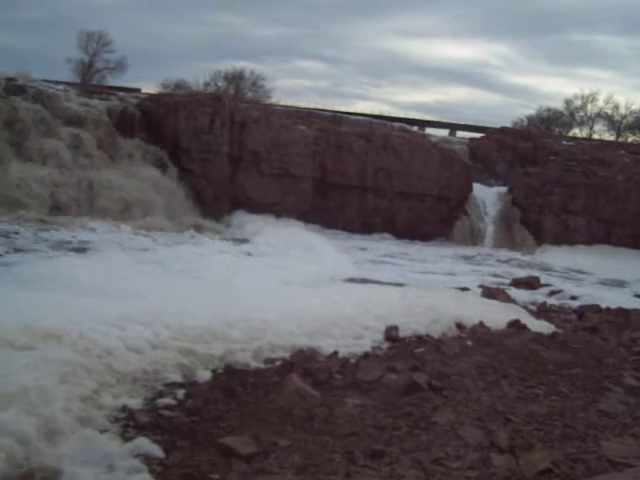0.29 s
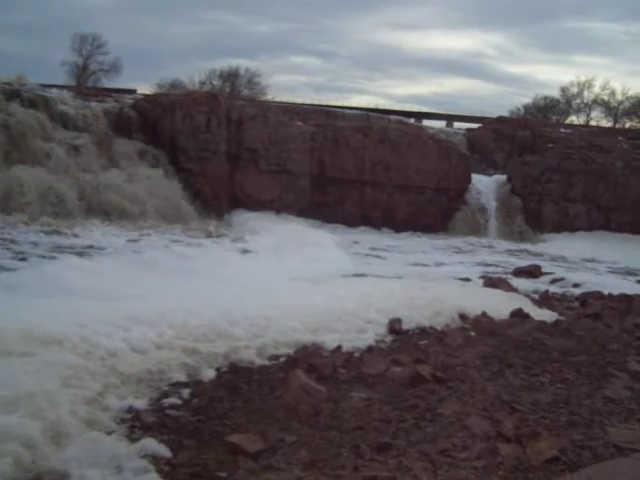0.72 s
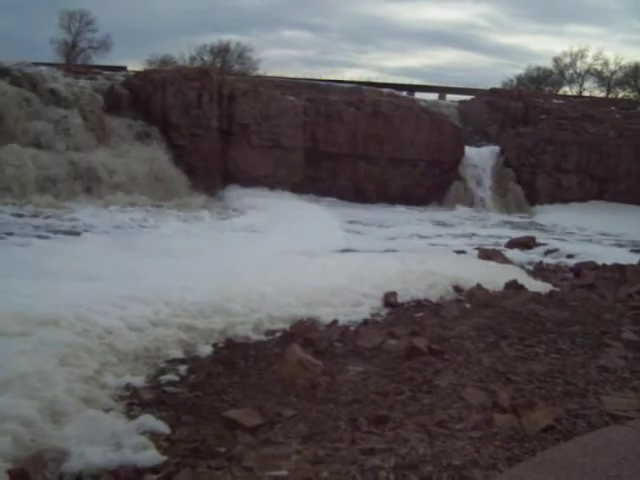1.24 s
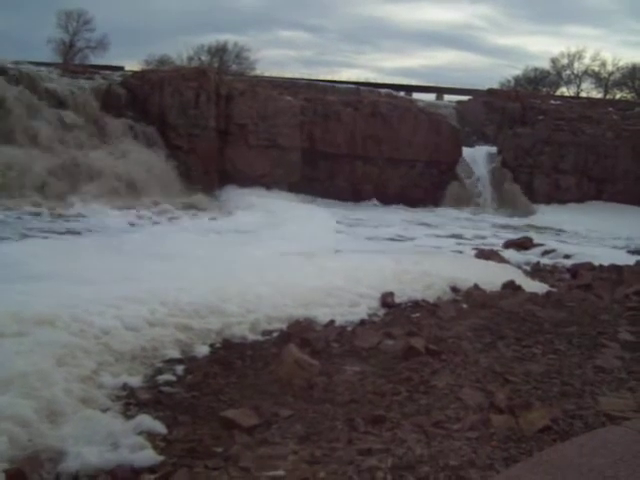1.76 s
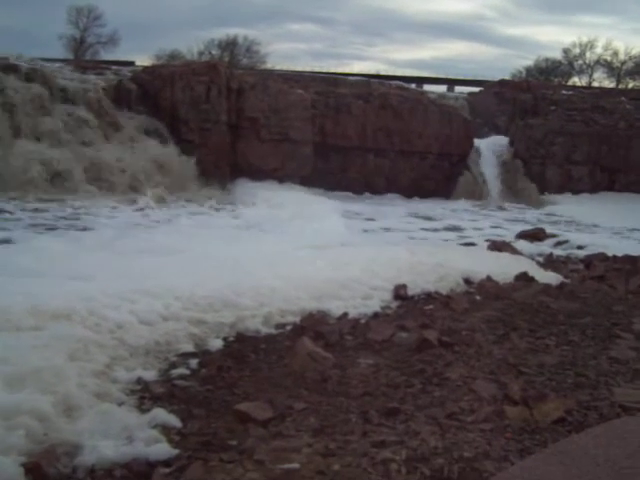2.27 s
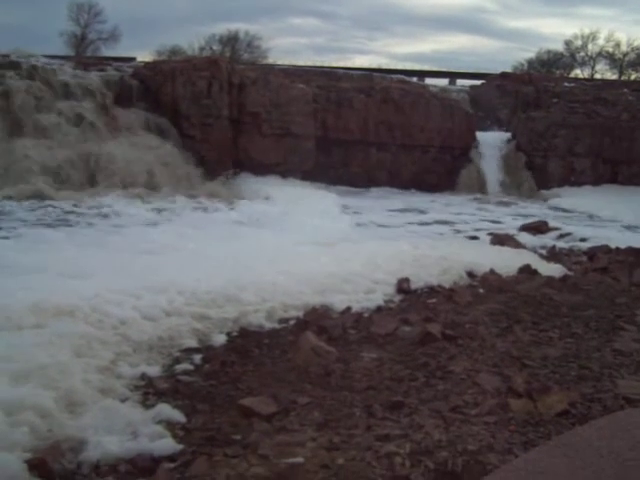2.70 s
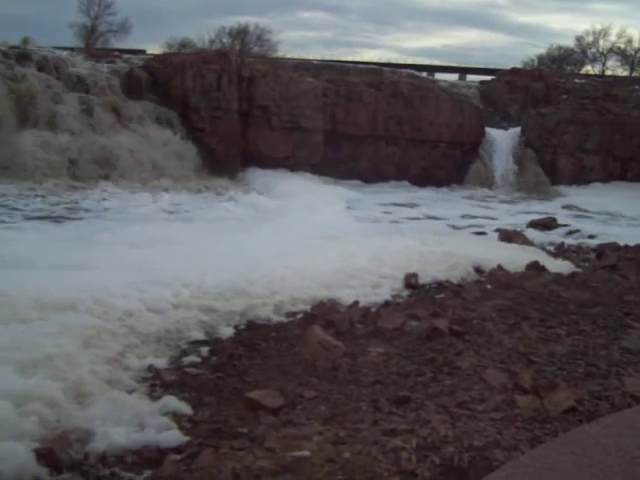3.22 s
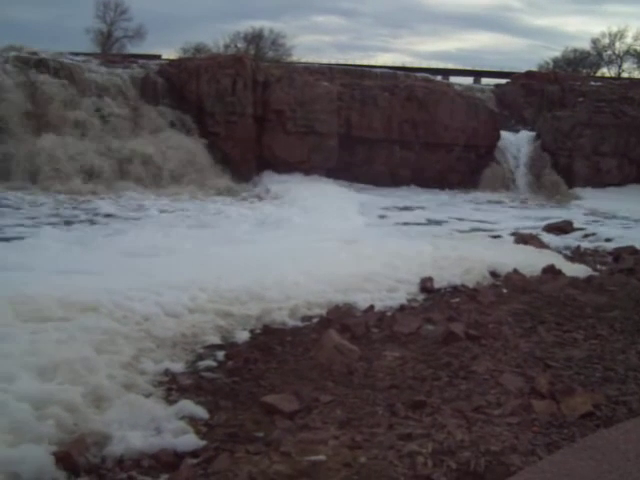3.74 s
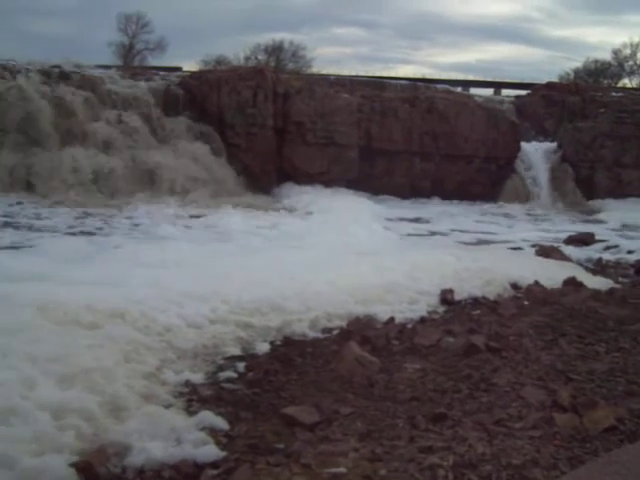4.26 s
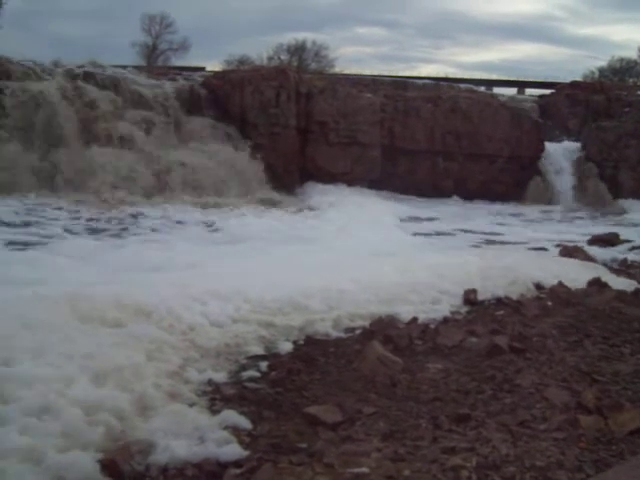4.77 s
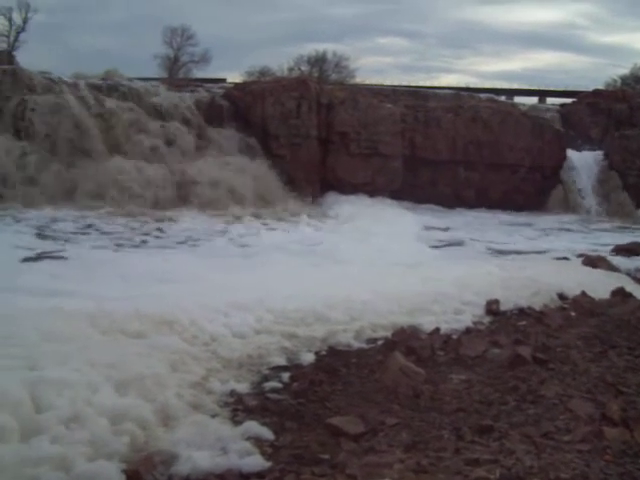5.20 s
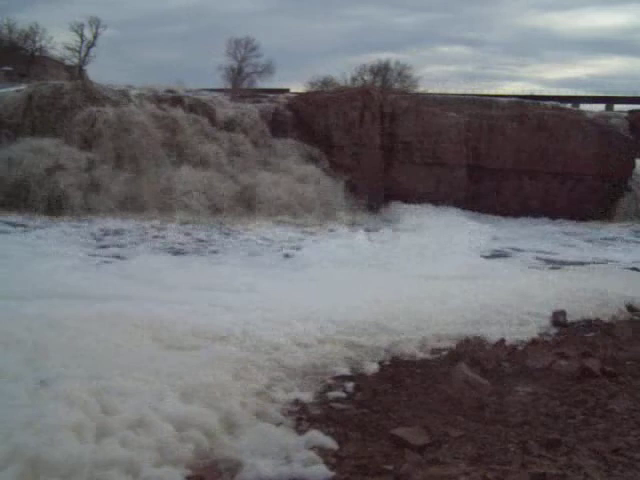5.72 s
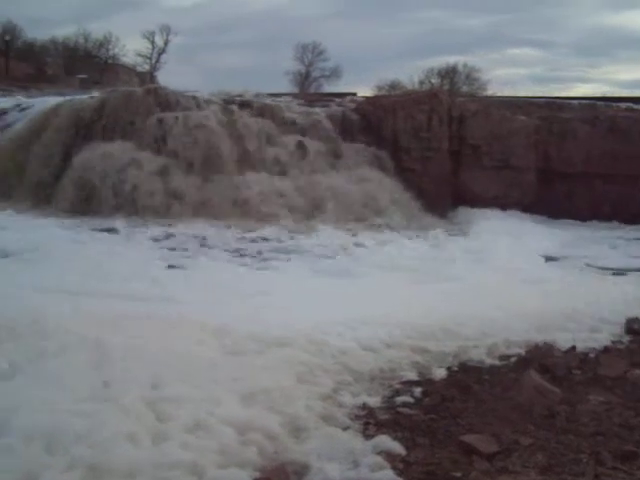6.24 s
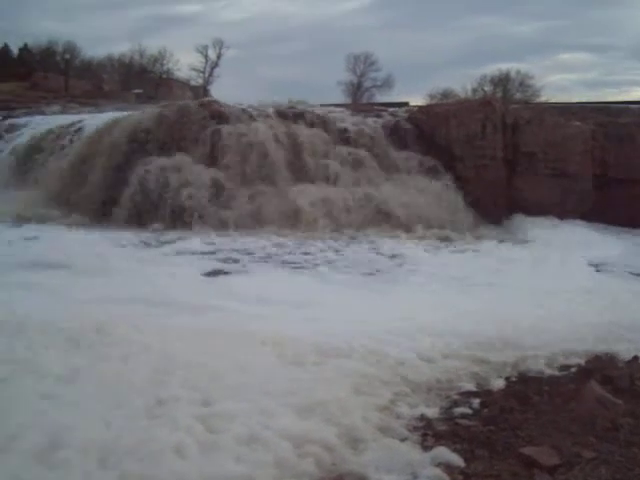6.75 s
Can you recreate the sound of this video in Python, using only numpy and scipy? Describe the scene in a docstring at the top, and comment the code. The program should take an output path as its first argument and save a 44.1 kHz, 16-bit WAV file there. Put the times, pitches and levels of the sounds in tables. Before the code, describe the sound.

A flooded river pours over rock ledges into a pool, making a loud, steady roar with a bright hiss of spray on top. The microphone is outdoors on the bank, where a few faint gusts of wind brush it at first. In the last couple of seconds the wind hits harder, adding low rumbling, fluttering and short thumps, while the water rushes on unchanged.

```python
"""On the stony bank of a river in flood, where water pours over rock ledges into a foaming pool.
The plunging water roars and its spray hisses: countless bubbles, each a damped resonator,
merge with the splashes into broadband noise. Gusts of wind buffet the microphone with turbulent
pressure, harder towards the end as it turns to face the main fall."""
import sys
import numpy as np
from scipy import signal
from scipy.fft import rfft, irfft, next_fast_len
from scipy.io import wavfile
from scipy.ndimage import uniform_filter1d, map_coordinates

SR = 44100
rng = np.random.default_rng(int(sys.argv[2]) if len(sys.argv) > 2 else 0)


def master(y):
    """Save y as 16-bit WAV."""
    cut = np.clip(np.atleast_2d(y).T, -1, 1)
    pcm = np.round(cut * 32767)  # scale
    wavfile.write(sys.argv[1], SR, pcm.astype(np.int16))


N = 308259

# Envelopes of the plunging water, the thrown spray and the finest mist: t/s, level/dB
ROAR_LEVELS = [(0, -27.5), (1.05, -26.5), (1.3, -28.5), (1.5, -27), (2.4, -27), (2.7, -28), (3.6, -27),
               (4.28, -28.5), (4.58, -26), (5.3, -27), (5.58, -26), (5.95, -27.5), (6.99, -27.5)]
SPRAY_LEVELS = [(0, -20), (2.6, -20.5), (3.7, -20.5), (4.8, -20.5), (5.15, -20.5), (6.99, -22)]
MIST_LEVELS = [(0.4, -28.5), (1.1, -27.5), (1.5, -28.5), (2.85, -28), (3.4, -27), (4.25, -28), (4.7, -27),
               (6.99, -29.5)]
# Spectral shapes of the same three: f/Hz, relative level/dB
ROAR_SPECTRUM = [(20, -21), (60, -1), (125, -1), (175, 3.5), (225, 2.5), (305, 1.6), (410, -7), (560, 1),
                 (800, -1.5), (950, -0.9), (1280, -1.5), (1680, 2.5), (2100, -1.5), (3200, -45.5)]
SPRAY_SPECTRUM = [(1200, -24.5), (2000, -13), (2350, -6), (2750, -4.5), (3250, -0.5), (3550, 1), (4000, -1),
                  (4600, -7.5), (5500, -18.5), (7500, -52)]
MIST_SPECTRUM = [(3000, -28), (4300, -1.5), (5100, 2.5), (6000, -1), (7200, -7.5), (7700, -14.5),
                 (8400, -24), (8850, -40), (9100, -55.5)]
# Gusts reaching the microphone: onset t/s, duration/s, level/dB
GUST_EVENTS = [(0.081, 0.13, -38), (1.312, .42, -38), (1.77, .14, -32.5), (2.43, .13, -36.5),
               (2.78, 0.14, -38.5), (3.367, .07, -37.5), (4.269, 0.21, -36.5), (4.815, .04, -31),
               (4.94, .11, -32), (5.151, .08, -28), (5.561, .11, -28), (5.719, .06, -32.5),
               (5.879, .08, -27), (6.029, 0.15, -32), (6.224, .08, -28.5), (6.4, 0.068, -30),
               (6.5, .05, -31), (6.58, 0.093, -29), (6.7, 0.054, -34), (6.798, .1, -26.5),
               (6.926, 0.063, -29.5)]
# Spectral shapes of the wind's slow buffet and of its small eddies: f/Hz, relative level/dB
BUFFET_SPECTRUM = [(8, -6), (20, -3), (35, -2), (65, 0.5), (100, -5.5), (160, -13), (300, -29), (700, -62)]
EDDY_SPECTRUM = [(30, -16), (80, -2.5), (135, 2.5), (200, 0), (300, -3.5), (470, -10), (800, -24.5),
                 (2000, -56.5)]
# Impacts of the hardest eddies: t/s, pulse level/dB
SLAP_EVENTS = [(4.84, -16.5), (6.056, -13.5), (6.274, -10), (6.406, -11.5), (6.449, -11), (6.524, -13),
               (6.638, -9.5), (6.671, -11.5), (6.869, -11), (6.941, -10.5)]

TURN_FROM_S, TURN_TO_S = 4.66, 6.7  # the microphone swings into the wind
AIR_DB, AIR_DRIFT_DB, TURN_AIR_DB = -41, 1.5, 6  # light air: level, slow swing, gain from the turn
EDDY_SHELTERED_DB, EDDY_FACING_DB = -9, 1  # flutter relative to buffet, before and after the turn
BAND_LIMIT_HZ = 9100


def waterfall():
    """Resonant frequency varies inversely with size: big bubbles roar, small ones and spray hiss."""
    surge = wobble(rate_hz=20)  # sheets of water land unevenly
    gurgle = bubbles(count=5000, centre_hz=901, spread_octaves=1.405, decay_cycles=2.8, rise=0.037)
    splash = bubbles(count=7000, centre_hz=3750, spread_octaves=1, decay_cycles=1.5, rise=0.022)
    roar = coloured(churn(patchy_db=0.18) + amp(-13.5) * gurgle, ROAR_SPECTRUM)
    spray = coloured(churn(patchy_db=0.46) + amp(-13.5) * splash, SPRAY_SPECTRUM)
    mist = coloured(churn(patchy_db=0.35), MIST_SPECTRUM)
    return (roar * amp(curve(ROAR_LEVELS))
            + spray * amp(curve(SPRAY_LEVELS) + 0.26 * surge)
            + mist * amp(curve(MIST_LEVELS) + 0.45 * surge))


def churn(patchy_db):
    """Incoherent sources sum to noise, whose bands swell and fade like clouds of bubbles."""
    bands = signal.stft(rng.standard_normal(N), nperseg=512)[2]
    clouds = uniform_filter1d(rng.standard_normal(bands.shape), size=7, axis=0)  # smooth in frequency
    clouds = uniform_filter1d(clouds, size=16, axis=1)  # and in time
    return unit(signal.istft(bands * amp(patchy_db * unit(clouds)), nperseg=512)[1][:N])


def bubbles(count, centre_hz, spread_octaves, decay_cycles, rise, size_db=2.0):
    """Damped oscillation: each bubble rings at a random time, its pitch rising as it nears the surface."""
    when, pitch, size = rng.random((count, 3)).T[:, :, None]
    hz = centre_hz * 2 ** (spread_octaves * (2 * pitch - 1))
    offsets = np.arange(512)
    cycles = hz * offsets / SR
    age = cycles / decay_cycles
    ring = np.sin(2 * np.pi * cycles * (1 + rise * np.minimum(age, 2))) * np.exp(-age)
    strength = amp(-size_db * np.log(np.maximum(size, 0.01)))
    samples = (when * N).astype(int) + offsets
    return unit(np.bincount(samples.ravel(), (strength * ring).ravel(), N)[:N])


def wind():
    """Turbulent pressure acts on the microphone; facing the flow, it meets more small, sharp eddies."""
    facing = curve([(TURN_FROM_S, 0), (TURN_TO_S, 1)])
    air = amp(AIR_DB + TURN_AIR_DB * facing + AIR_DRIFT_DB * wobble(rate_hz=6))
    pressure = np.sqrt(air ** 2 + gust_power())
    buffet = steady(coloured(rng.standard_normal(N), BUFFET_SPECTRUM))
    bursts = rng.standard_normal(N) * amp(3.0 * wobble(rate_hz=170))
    eddies = steady(coloured(bursts, EDDY_SPECTRUM))
    flutter = eddies * amp(EDDY_SHELTERED_DB + (EDDY_FACING_DB - EDDY_SHELTERED_DB) * facing)
    return pressure * (buffet + flutter) + eddy_slaps()


def gust_power(attack_s=0.015, release_s=0.029):
    """Incoherent gusts add in power; each grows exponentially, holds and decays."""
    t, power = np.arange(N) / SR, np.zeros(N)
    for start, duration, db in GUST_EVENTS:
        before = np.maximum(start - t, 0) / attack_s
        after = np.maximum(t - start - duration, 0) / release_s
        power += (amp(db) * np.exp(-before - after)) ** 2
    return power


def eddy_slaps(median_width_s=0.00089):
    """A passing eddy gives a pressure pulse of either sign, with a weak rebound on each side."""
    t, pressure = np.arange(N) / SR, np.zeros(N)
    for centre_s, db in SLAP_EVENTS:
        size, polarity = rng.standard_normal(2)
        u = np.clip((t - centre_s) / (median_width_s * amp(2 * size)), -10, 10)
        push = np.exp(-u * u)
        rebound = np.exp(-(u / np.e) ** 2) / np.e
        pressure += np.sign(polarity) * amp(db) * (push - rebound)
    return pressure


def amp(db):
    """Amplitude ratio of a level in decibels."""
    return 10 ** (np.asarray(db) / 20)


def unit(x):
    """Normalisation to rms 1."""
    return x / np.sqrt(np.mean(x ** 2) + 1e-20)


def steady(x):
    """Normalisation to short-term rms 1, so that an envelope alone sets the size of the swings."""
    return x / np.sqrt(np.abs(uniform_filter1d(x ** 2, size=3500)) + 1e-6)


def curve(points):
    """Linear interpolation of (t/s, value) points at every sample."""
    return np.interp(np.arange(N) / SR, *np.transpose(points))


def wobble(rate_hz):
    """Smooth random modulation: a spline through rate_hz Gaussian knots a second."""
    knots = rng.standard_normal(int(N * rate_hz / SR) + 4)
    return map_coordinates(knots, [np.arange(N) * rate_hz / SR])


def filtered(x, response):
    """Linear filtering: the spectrum is multiplied by a frequency response."""
    size = next_fast_len(N + SR // 2)
    return irfft(rfft(x, size) * response(np.fft.rfftfreq(size, 1 / SR)), size)[:N]


def coloured(x, spectrum):
    """Spectral shaping by (f/Hz, level/dB) points on a log frequency axis, at rms 1."""
    f, db = np.transpose(spectrum)
    return unit(filtered(x, lambda hz: amp(np.interp(np.log(hz + 1), np.log(f), db))))


def scene():
    """Superposition: the pressures of water and wind add at one microphone."""
    return (waterfall() + wind())[None]


def record(dry):
    """An ideal low-pass filter passes nothing above the band limit."""
    return np.array([filtered(channel, lambda hz: hz < BAND_LIMIT_HZ) for channel in dry])


dry = scene()
out = record(dry)
master(out)
```